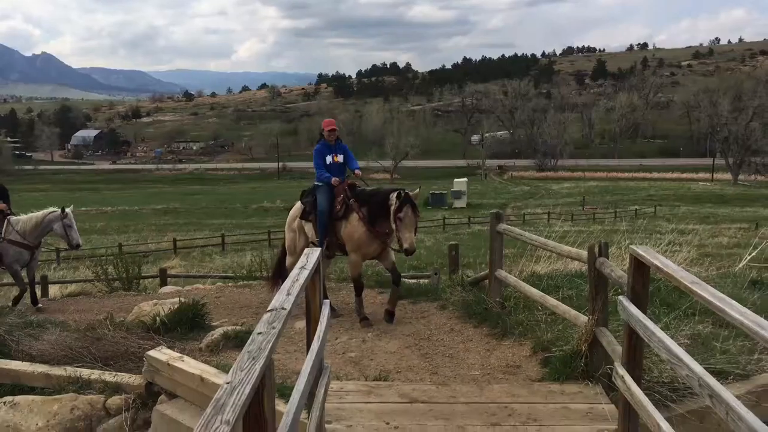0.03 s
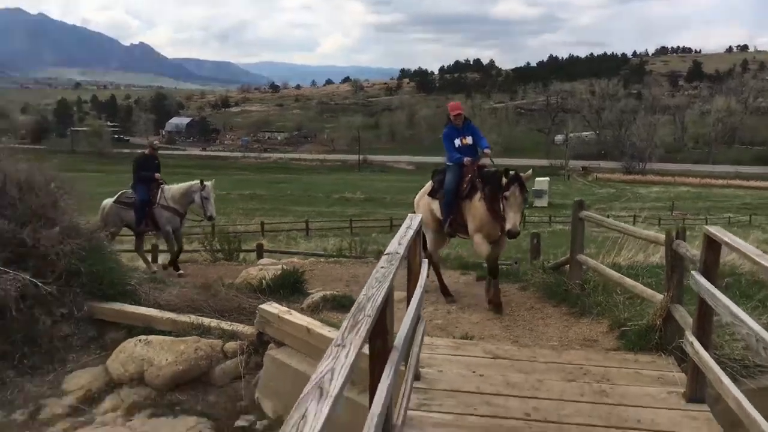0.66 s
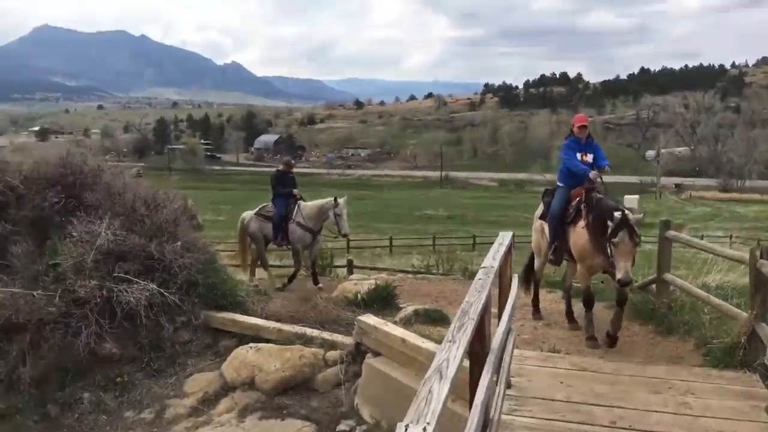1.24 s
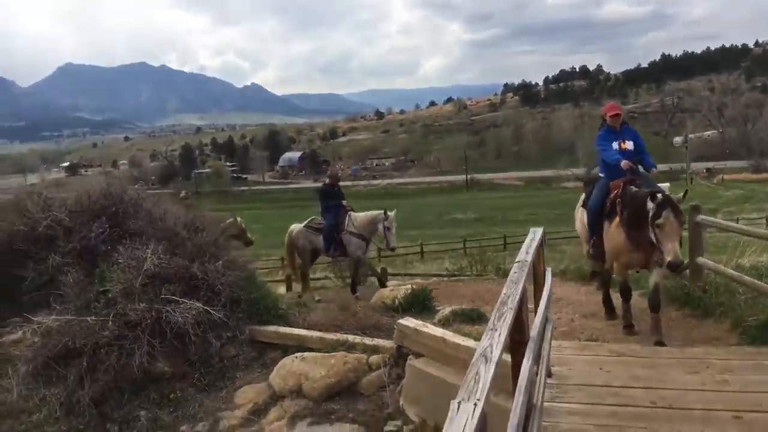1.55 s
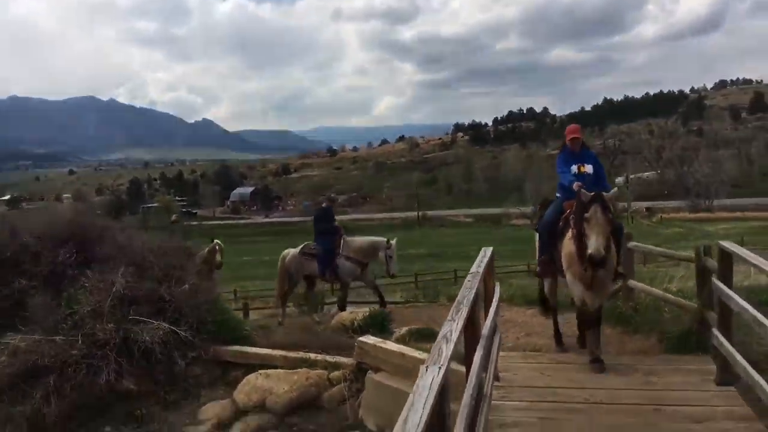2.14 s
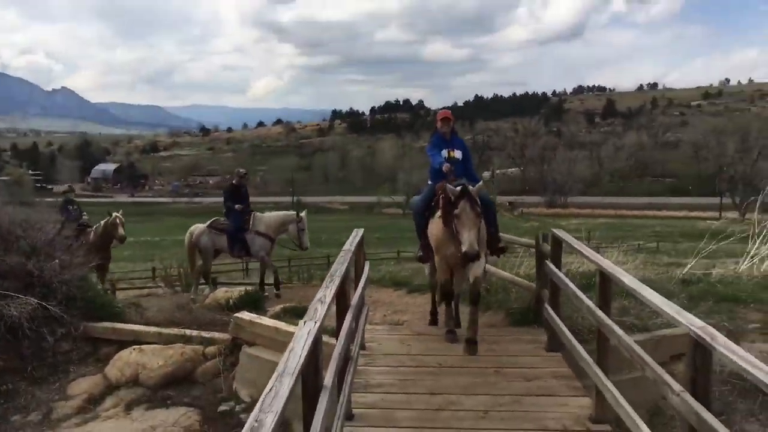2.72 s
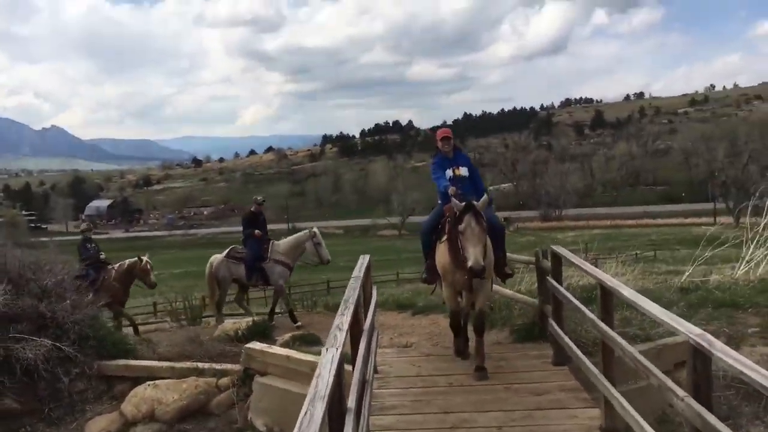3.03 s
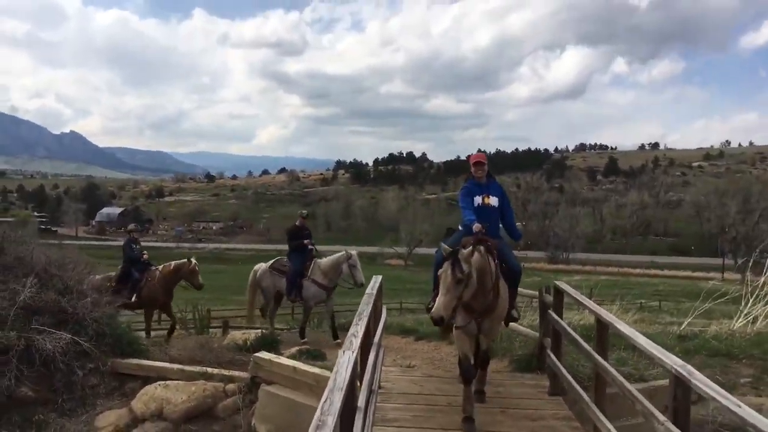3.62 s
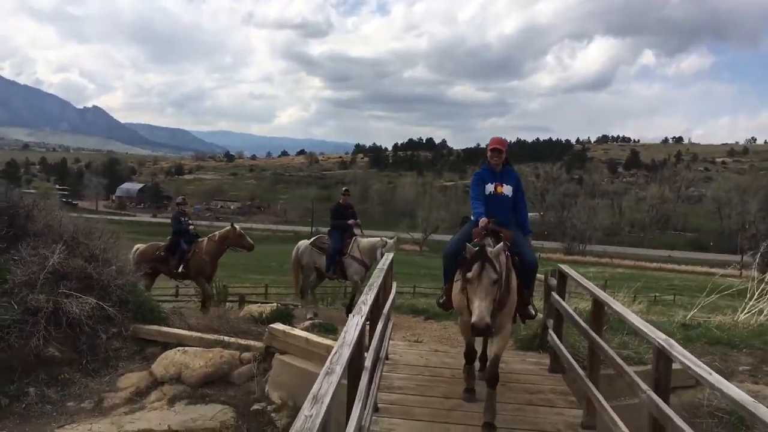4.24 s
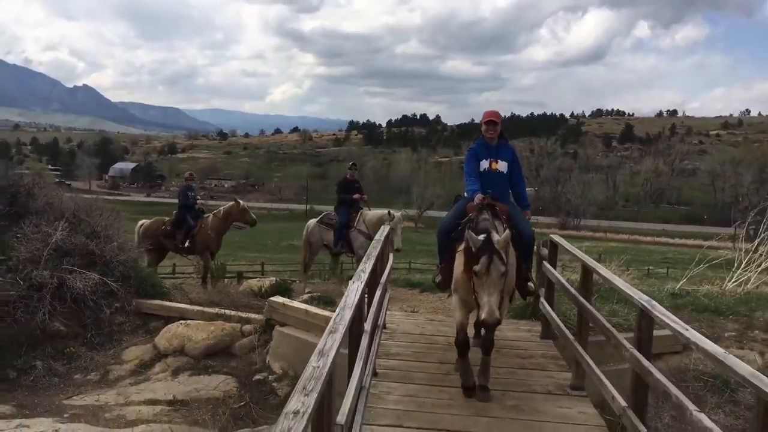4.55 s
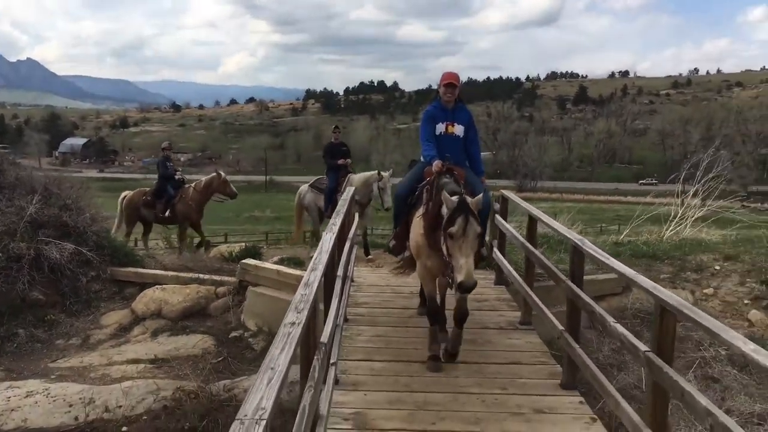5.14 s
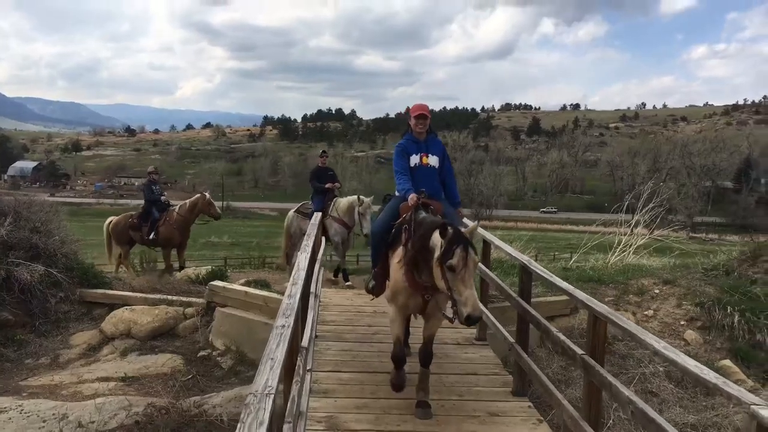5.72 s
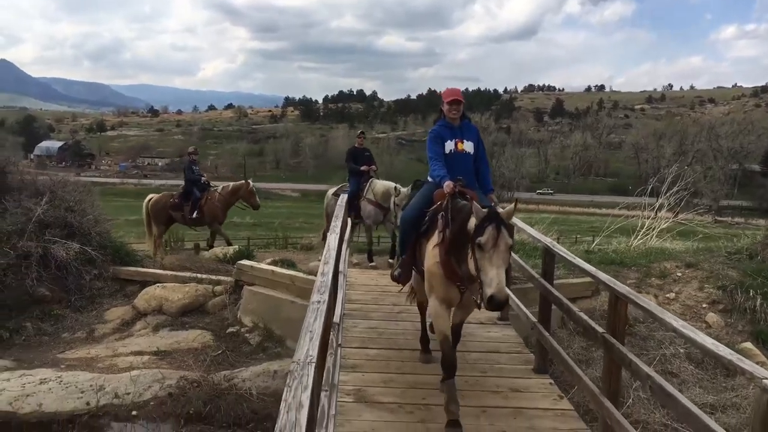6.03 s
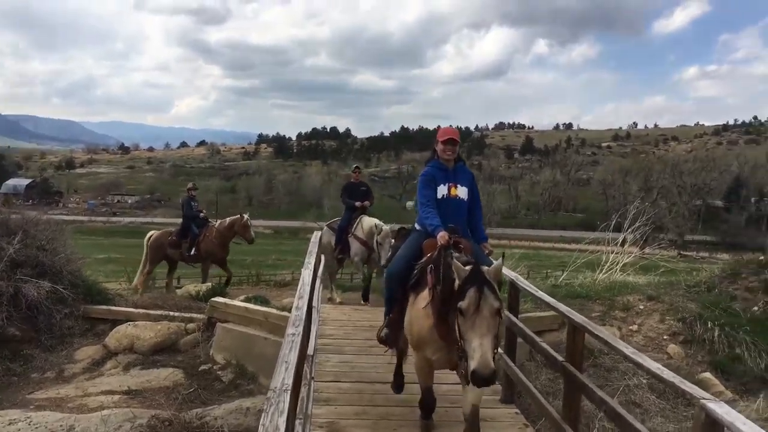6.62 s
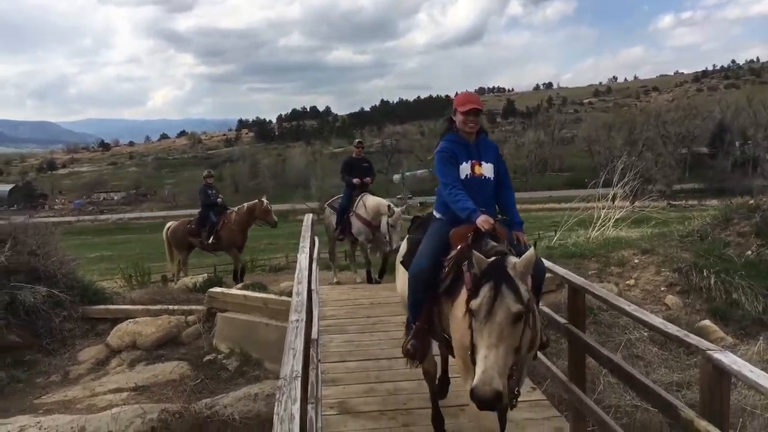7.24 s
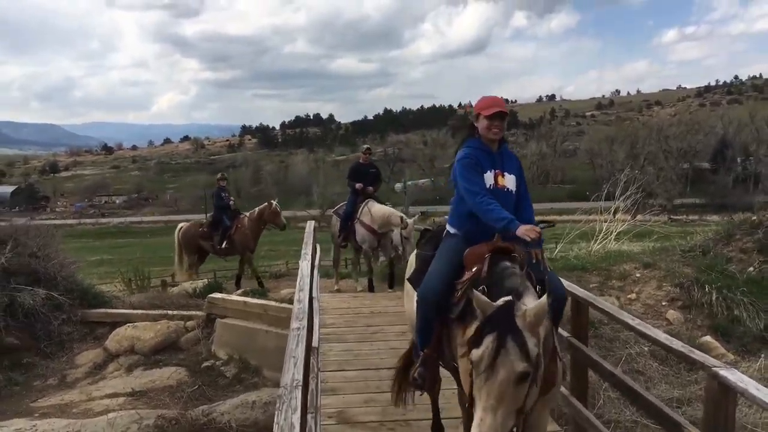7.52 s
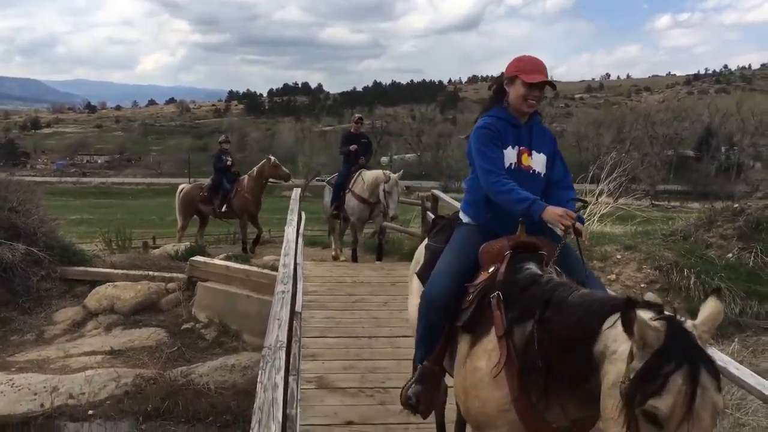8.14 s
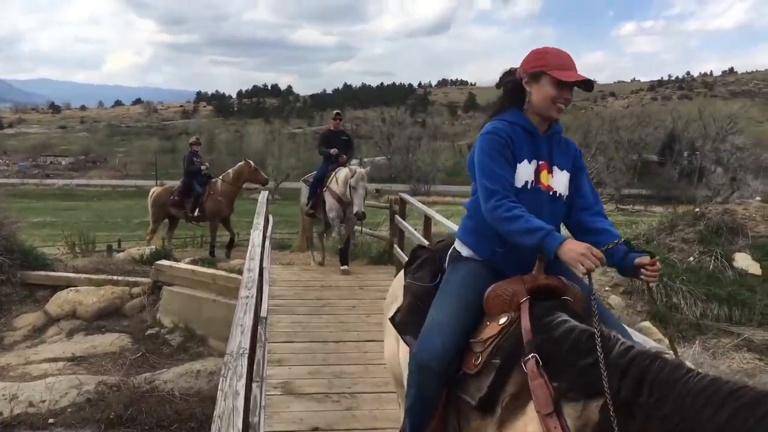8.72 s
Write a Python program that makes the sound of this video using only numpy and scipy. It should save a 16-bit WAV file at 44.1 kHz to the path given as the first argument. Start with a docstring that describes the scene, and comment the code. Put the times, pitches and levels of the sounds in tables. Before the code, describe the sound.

A horse walks over a wooden footbridge in an open valley. Hoofbeats begin almost at once and continue unevenly, about three or four a second, some in quick pairs. Each is a hollow knock on a plank with a low boom from the deck and a slight crunch of grit. A dry click comes just after 1 second as a hoof clips something hard. The heaviest step lands at about 2.2 seconds, and strong, booming steps follow until about 5 seconds. From 6 seconds the steps are somewhat lighter, with another click near 6.8 and a last hard knock at about 8.5. Metal on the bit and saddle clinks faintly throughout, and a buckle rings softly several times between 4 and 7 seconds. Underneath, light wind rumbles on the microphone over a distant rush and a very faint, fast, high ticking.

```python
"""A plank footbridge in an open valley: a horse walks over it, with others following.
Each hoof knocks a plank, crunches grit and sets the whole deck booming; the deck booms again as it
sags under the weight. The metal on bit and saddle clinks, and now and then a hoof clips something hard.
Light wind and a distant rush lie underneath, with a faint, fast ticking close by."""
import sys
import numpy as np
from scipy import signal
from scipy.fft import rfft, irfft, next_fast_len
from scipy.io import wavfile
from scipy.ndimage import uniform_filter1d

SR = 44100
rng = np.random.default_rng(int(sys.argv[2]) if len(sys.argv) > 2 else 0)


def wav_record(signal):
    """Record a signal, one row per channel, as 16-bit PCM in the file named by sys.argv[1]."""
    frames = np.transpose(np.atleast_2d(signal))
    bounded = np.clip(frames, -1, 1)
    # unit amplitude maps onto the largest positive 16-bit level
    quanta = np.round(bounded * 32767).astype(np.int16)
    wavfile.write(sys.argv[1], SR, quanta)


N = 386757
TIME = np.arange(N) / SR
BLOW = np.arange(SR * 6 // 10) / SR  # the seconds that one blow lasts

# Hoof blows; roll_s is how long the hoof takes to roll flat, ring_factor stretches the wood's ringing:
# start_s, roll_s, ring_factor, plank_hz, boom_db, thud_db, knock_db, clack_db
HOOF_BLOWS = [(0.226, .011, 1.34, 401, -31, -34, -43, -50), (0.463, 0.0088, 1.5, 335, -28, -44, -60, -59.5),
              (0.543, 0.0027, 1.02, 313, -27.5, -29.5, -38, -56.5),
              (0.9, 0.0047, 1.2, 297, -40, -32, -33.5, -56),
              (0.966, 0.0042, 0.98, 355, -34.5, -44, -36, -53.5),
              (1.28, 0.0071, 0.54, 384, -29.5, -29.5, -41, -60.5),
              (1.655, 0.0052, .8, 255, -28, -27.5, -36.5, -49.5),
              (1.988, 0.0031, 1.1, 390, -40, -42, -44.5, -68),
              (2.208, 0.0021, 0.65, 327, -12, -22.5, -25.5, -37),
              (2.287, 0.0044, 1.8, 316, -36, -26, -39, -52.5),
              (2.323, 0.0014, 1, 361, -20.5, -35, -34.5, -45.5),
              (2.5, 0.0058, 1.1, 286, -33, -45, -51.5, -65),
              (2.656, 0.0012, .7, 277, -23.5, -27.5, -42, -59),
              (2.911, 0.0057, 1.3, 399, -19, -25, -31.5, -43.5),
              (3.157, 0.0017, .7, 345, -26, -19, -35, -45), (3.198, .004, 1.1, 330, -20.5, -37, -58, -78),
              (3.263, 0.0024, 0.86, 366, -38, -31, -39.5, -66),
              (3.478, 0.0062, 0.53, 353, -32.5, -27.5, -33, -61),
              (3.553, 0.0091, 0.96, 255, -40, -37, -36, -51),
              (3.709, 0.012, 0.69, 379, -22.5, -24, -39.5, -57.5),
              (3.946, 0.0023, 1.45, 308, -33.5, -36, -38.5, -49.5),
              (4.204, 0.0018, 0.63, 420, -22, -34, -35, -56),
              (4.251, 0.0038, 1.2, 411, -37, -35.5, -37, -58),
              (4.596, 0.0054, 1.35, 326, -28.5, -28.5, -38, -56),
              (4.863, 0.0064, 0.8, 285, -18.5, -28.5, -38, -53.5),
              (5.229, 0.0015, 0.96, 362, -28, -28, -30, -53.5),
              (5.51, 0.0056, 0.74, 290, -53, -33.5, -34.5, -63),
              (5.872, 0.002, 1.1, 490, -29, -31.5, -31.5, -49),
              (6.13, .0039, 0.5, 376, -41, -43, -46.5, -88),
              (6.152, .0027, 0.65, 393, -39, -38, -37.5, -81),
              (6.194, 0.0028, 0.74, 372, -47, -41.5, -42.5, -92),
              (6.476, 0.0019, 1.8, 368, -35, -29.5, -38.5, -55.5),
              (6.757, 0.0042, 1.63, 368, -45, -35, -36.5, -54.5),
              (6.89, 0.0085, 1.8, 379, -53, -43.5, -52, -57.5),
              (7.126, 0.0022, 0.65, 330, -30.5, -29.5, -29.5, -48.5),
              (7.164, 0.0028, 1.3, 378, -50, -43, -41, -63),
              (7.384, 0.0064, 1.5, 373.6, -41, -32.5, -37, -55),
              (7.772, 0.0054, 1.24, 287, -38, -33.5, -37, -57.5),
              (8.054, 0.0075, 1.47, 268, -38, -32, -42, -59),
              (8.471, 0.0014, 0.69, 387, -27, -24.5, -21.5, -41)]


def from_db(db):
    """Turn decibels into a number to multiply by."""
    return 10 ** (np.asarray(db) / 20)


def rms_one(x):
    """Scale a sound so that its average strength (rms) is 1."""
    return x / np.sqrt(np.mean(x ** 2) + 1e-20)


def at_level(x, db, opening_s=.04):
    """Scale a sound so that its opening has the given level."""
    return x * from_db(db) / np.sqrt(np.mean(x[:int(opening_s * SR)] ** 2) + 1e-20)


def look_up(x, rows):
    """Read a value off straight lines drawn between (x, value) rows."""
    return np.interp(x, *np.transpose(rows))


def add(track, start_s, sound):
    """Mix a sound into the track at the given time."""
    start = int(np.clip(start_s * SR, 0, N - 1))
    track[start:start + len(sound)] += sound[:N - start]


def fade(fade_s):
    """Die away by 60 dB in fade_s seconds."""
    return np.exp(-np.log(1000) * BLOW / fade_s)


def hiss():
    """Plain noise, as long as one blow."""
    return rng.standard_normal(len(BLOW))


def noise(spectrum, size):
    """Noise of strength 1, shaped by (pitch_hz, relative_db) rows."""
    hz, db = np.transpose(spectrum)
    padded = next_fast_len(size)
    bins_hz = np.arange(padded // 2 + 1) * SR / padded
    gain = from_db(np.interp(np.log(bins_hz + 1), np.log(hz), db))
    shaped = rfft(rng.standard_normal(padded)) * gain
    return rms_one(irfft(shaped, padded)[:size])


def band(x, low_hz, high_hz):
    """Keep the part of a sound between two pitches."""
    return signal.sosfilt(signal.butter(2, [low_hz, high_hz], "band", fs=SR, output="sos"), x)


def resonance(x, hz, width_hz):
    """Make a sound ring at one pitch; a narrower width rings longer."""
    r = np.exp(-np.pi * width_hz / SR)
    feedback = [1, -2 * r * np.cos(2 * np.pi * hz / SR), r * r]
    return signal.lfilter(np.array([1, 0, -1]) * (1 - r * r) / 2, feedback, x + 1e-18)


def valley(rush_db=-53, swell_db=2.28, wind_boost_db=1):
    """Distant air rushes and swells a little, while wind rumbles on the microphone."""
    # Tone of the valley air: pitch_hz, relative_db
    rush_tone = [(100, -14.5), (200, 6.5), (320, -4), (480, -6.5), (870, -1), (1100, -7.5), (1500, -11.5),
                 (2100, -11.5), (2550, -23.5), (4500, -24.5), (5300, -25.5), (6700, -23.5), (10000, -44),
                 (16000, -63)]
    # Tone of the wind: pitch_hz, relative_db
    wind_tone = [(15, -10), (28, -31), (42, 1), (58, 4), (75, -1.5), (100, -8.5), (160, -20), (300, -40.5),
                 (800, -56)]
    # Gusts, before the boost: time_s, level_db
    gusts = [(0.3, -36.5), (0.44, -34), (0.7, -37), (2.16, -41), (2.42, -38), (2.73, -36), (3.11, -34.5),
             (3.91, -42.5), (5.02, -35), (7.0, -44.5), (7.45, -38), (8.09, -41.5), (8.22, -45.5),
             (8.77, -41.5)]
    wind = from_db(look_up(TIME, gusts) + wind_boost_db) * noise(wind_tone, N)
    swell = rms_one(uniform_filter1d(rng.standard_normal(N), size=SR // 4))
    return from_db(rush_db + swell_db * swell) * noise(rush_tone, N) + wind


def ticking(level_db=-66, ticks_per_s=60, strays_per_s=35, jitter_s=0.00014, uneven_db=2):
    """Tiny, nearly regular ticks with stray ones between them, all with the same high ring."""
    # The ring of a tick: pitch_hz, width_hz, relative_db
    tick_notes = [(4490, 650, 3.5), (6530, 510, 10), (8120, 410, -3.5), (9030, 250, -6.5)]
    clicks = 1.0 * (rng.random(N) < strays_per_s / SR)
    beats_s = np.arange(0, N / SR, 1 / ticks_per_s)
    beats_s += jitter_s * rng.standard_normal(len(beats_s))
    clicks[np.clip(beats_s * SR, 0, N - 1).astype(int)] = 1
    clicks *= from_db(uneven_db * rng.standard_normal(N))
    rings = sum(from_db(db) * resonance(clicks, hz, width) for hz, width, db in tick_notes)
    return from_db(level_db) * rms_one(band(rings, 2100, 10500))


def clink(scrape_s, hz, ring_db, fade_s):
    """A short scrape rings a small piece of metal, with a glint high above."""
    rub = hiss() * np.exp(-BLOW / scrape_s)
    metal = resonance(rub, hz, width_hz=np.log(1000) / (np.pi * fade_s))
    glint = resonance(rub, 11800 * (1 + 0.062 * rng.standard_normal()), width_hz=900)
    scrape = band(rub, 2900, 6200) + from_db(-12) * band(rub, 6000, 10200) + from_db(-8) * glint
    return at_level(scrape, 0) + at_level(metal, ring_db)


def bit_and_saddle(clink_hz=4430, buckle_hz=6120, faint_db=-65, faint_count=45):
    """Metal clinks as the saddle moves: clear clinks, one ringing buckle and faint clinks at random."""
    # Clinks and scuffs: start_s, scrape_s, ring_over_scrape_db, level_db
    clinks = [(0.218, 0.044, -7, -53.5), (0.25, 0.01, -9, -53), (1.004, .0094, -3, -51),
              (1.218, 0.03, -7, -56), (1.243, 0.01, -4, -56), (2.21, .002, -12, -61),
              (3.584, 0.011, 1, -57.5), (3.685, 0.031, -4, -58.5), (4.137, .001, -6, -70),
              (4.254, 0.0031, -17, -61.5), (4.645, 0.0069, -9, -60.5), (4.895, 0.0055, -6, -53.5),
              (5.183, 0.018, 2, -56.5), (5.734, 0.028, -10, -58), (6.122, .0015, -8, -66),
              (6.562, 0.0023, -17, -55.5), (6.785, .004, -1, -51.5), (6.9, 0.029, -7, -55),
              (7.621, 0.0093, -12, -57.5), (7.785, .0072, -7, -57), (7.847, 0.011, -16, -56),
              (8.088, 0.0077, -18, -50.5), (8.509, .013, -23, -58.5), (8.584, 0.0099, 11, -57.5)]
    # Rings of the buckle: start_s, level_db
    buckle_rings = [(3.984, -59), (5.313, -56), (6.349, -60), (6.562, -59), (7.16, -55)]
    out = np.zeros(N)
    for start_s, scrape_s, ring_db, db in clinks:
        hz = clink_hz * (1 + 0.032 * rng.standard_normal())
        add(out, start_s, at_level(clink(scrape_s, hz, ring_db, fade_s=.015), db))
    for start_s, db in buckle_rings:
        buckle = clink(scrape_s=0.0062, hz=buckle_hz, ring_db=-3.5, fade_s=0.17)
        add(out, start_s, at_level(buckle, db))
    for when, pitch, softness in rng.random((faint_count, 3)):
        faint = clink(scrape_s=0.0089, hz=3400 + 1800 * pitch, ring_db=-4, fade_s=0.01)
        add(out, when * N / SR, at_level(faint, faint_db - 6 * softness))
    return out


def hoof_force(roll_s, touches_per_s=2500):
    """The toe strikes first, then the rim of the hoof rolls down in many small touches."""
    touches = (rng.random(len(BLOW)) < touches_per_s / SR) * hiss()
    force = touches * BLOW / roll_s * np.exp(1 - BLOW / roll_s)
    force[0] = 2.18  # the toe
    return force


def wood(force, notes, ring_factor, low_hz, high_hz, crack_db, rattle_db, rattle_s):
    """A struck plank gives a dry crack and rings at its own notes; its neighbours rattle on."""
    hz, db, fade_s = np.transpose(notes)[:, :, None]
    tuning, strength, side = rng.standard_normal((3, len(notes), 1))  # no two blows ring alike
    gain = from_db(db + 2 * strength) * np.sign(side)
    waves = np.sin(2 * np.pi * hz * (1 + 0.033 * tuning) * BLOW)
    rings = (gain * fade(fade_s * ring_factor) * waves).sum(axis=0)
    struck = signal.fftconvolve(force, at_level(rings, 0))[:len(BLOW)]
    crack = signal.fftconvolve(force, hiss() * fade(0.023 * ring_factor))[:len(BLOW)]
    crack = at_level(band(crack, low_hz, high_hz), crack_db)
    rattle = rms_one(band(hiss(), low_hz, high_hz)) * fade(rattle_s * ring_factor)
    body = at_level(struck, 0) + crack + from_db(rattle_db) * rattle
    return band(body, 0.71 * low_hz, 1.234 * high_hz)


def wood_note(hz, fade_s, roll_s):
    """One clear note of the wood swells as the weight comes on; low notes take longer."""
    swell = 1 - np.exp(-BLOW / (roll_s + 0.68 / hz))
    return np.sin(2 * np.pi * hz * BLOW) * swell * fade(fade_s)


def grit(decay_s, uneven_db=4):
    """Grains crushed under the hoof make a short, rough hiss."""
    # Tone of crushed sand: pitch_hz, relative_db
    grit_tone = [(1500, 1), (2400, -10.5), (3300, -2), (4500, -3), (5500, -10), (7000, -30), (10000, -20),
                 (16000, -47)]
    grains = from_db(uneven_db * rms_one(uniform_filter1d(hiss(), size=40)))
    return noise(grit_tone, len(BLOW)) * grains * np.exp(-BLOW / decay_s)


def hooves(usual_plank_hz=345, usual_clack_db=-57):
    """Each hoof rings a plank, shakes the boards around it and crushes some grit."""
    # Notes of a plank on its beams: pitch_hz, relative_db, base_fade_s
    plank_notes = [(110.8, 2.5, 0.18), (144.6, -10, 0.068), (165.1, -3, 0.29), (209.7, -5.5, 0.34),
                   (231.8, -5.5, 0.21), (266.7, 0, 0.14), (317, -3.5, 0.12), (393, -3.5, 0.15),
                   (432.8, -7, 0.13), (524, 0.5, 0.23), (578, 6.5, 0.17), (631.6, -1, 0.33),
                   (673, -1, 0.11), (860, -3, 0.21), (997, -11, 0.17), (1152, -4, 0.031),
                   (1305, 10.5, 0.059), (1450, -28, 0.025), (1727, 6, 0.26), (1827, 6.5, 0.072),
                   (2043, 8.5, 0.14)]
    # The four parts of a blow, low to high (thud, knock, clop, clack):
    # low_hz, high_hz, crack_db, rattle_db, base_rattle_fade_s, main_note_db, base_main_note_fade_s
    parts = [(92.6, 210, -3.5, -0.5, 0.51, 0.5, 0.076), (236, 516, -4.5, -3, 0.37, -2, 0.095),
             (540, 1080, -2.5, -5, 0.22, -6, 0.089), (865, 1846, 7.5, 9, 0.28, -14, 0.012)]
    # Borders that share the plank's notes among the parts: pitch_hz
    borders_hz = [260, 500, 950]
    # Each part's main note: base_pitch_hz, share_of_plank_tuning, spread_octaves
    main_notes = [(118.9, 0.066, .17), (345, 0.96, 0.033), (587.4, 0.55, .1), (1040, 0.1, .16)]
    # Only the hardest blows reach the plank's high note: clack_db, clack_pitch_factor
    clack_rise = [(-39.5, 0.94), (-37.5, 2.19)]
    # Grit under a usual blow, thick before the bridge and thin on it: time_s, level_db
    grit_levels = [(0.9, -56), (2.5, -59.5), (5.5, -60), (8.4, -58)]
    out, plank = np.zeros(N), np.array(plank_notes)
    part_of_note = np.digitize(plank[:, 0], borders_hz)
    for start_s, roll_s, ring_factor, plank_hz, _, thud_db, knock_db, clack_db in HOOF_BLOWS:
        # where the hoof lands decides which notes stand out
        main_hz = [hz * (plank_hz / usual_plank_hz) ** share * 2 ** (spread * rng.standard_normal())
                   for hz, share, spread in main_notes]
        main_hz[-1] *= look_up(clack_db, clack_rise)
        clop_db = knock_db + 0.49 * (clack_db - knock_db) + 2.5
        levels_db = [thud_db, knock_db, clop_db, clack_db]
        force = hoof_force(roll_s)
        for k, (*wood_settings, note_db, note_fade_s) in enumerate(parts):
            body = wood(force, plank[part_of_note == k], ring_factor, *wood_settings)
            main = wood_note(main_hz[k], note_fade_s * ring_factor, roll_s)
            add(out, start_s, at_level(at_level(body, 0) + at_level(main, note_db), levels_db[k]))
        # loose boards along the bridge drum on after the thud
        boards = rms_one(band(hiss(), 107, 293)) * fade(0.51)
        add(out, start_s, from_db(thud_db - 23) * boards)
        grit_db = look_up(start_s, grit_levels) + 0.57 * (clack_db - usual_clack_db)
        add(out, start_s, at_level(grit(decay_s=6.3 * roll_s + .002), grit_db))
    return out


def boom(hz, swell_s=0.012):
    """The heavy deck starts to swing; the rest of the bridge rumbles on after it."""
    swing = np.sin(2 * np.pi * hz * BLOW) * (1 - np.exp(-BLOW / swell_s)) * fade(0.26)
    rumble = rms_one(band(hiss(), 52.6, 69.5)) * (1 - np.exp(-BLOW / 0.014)) * fade(0.79)
    return at_level(swing, 0) + from_db(-13) * rumble


def deck(lag_s=0.0049, sag_after_s=.095, sag_hz=61.2, usual_sag_db=-36.5, usual_knock_db=-34.5):
    """The deck booms under each blow and again as it sags under the horse's weight."""
    # A heavy landing booms lower than a light one: boom_db, pitch_hz
    boom_pitch = [(-32, 81.9), (-19, 69)]
    out = np.zeros(N)
    for start_s, _, _, _, boom_db, _, knock_db, _ in HOOF_BLOWS:
        add(out, start_s + lag_s, at_level(boom(look_up(boom_db, boom_pitch)), boom_db))
        sag = boom(sag_hz * (1 + 0.047 * rng.standard_normal()))
        sag_db = usual_sag_db + 0.48 * (knock_db - usual_knock_db)
        add(out, start_s + sag_after_s, at_level(sag, sag_db))
    return out


def glancing_hooves():
    """A hoof's rim grazes something hard: a dry click, a bright snap and a little grit."""
    # Glancing touches: start_s, level_db
    touches = [(1.14, -37.5), (3.844, -50.5), (4.559, -53.5), (4.896, -53), (6.784, -46)]
    out = np.zeros(N)
    for start_s, db in touches:
        click = band(hiss() * fade(.016), 400, 1350)
        snap = band(hiss() * fade(0.0093), 3700, 21000)
        crunch = grit(decay_s=.003)
        add(out, start_s, at_level(click, db) + at_level(snap, db - 25) + at_level(crunch, db - 12))
    return out


def scene():
    """Horses and bridge in the open air, in one channel."""
    return (hooves() + glancing_hooves() + deck() + bit_and_saddle() + ticking() + valley())[None]


def record(dry, start_s=0.0818, cutoff_hz=15900):
    """The sound opens after a moment of silence; the highest treble is cut."""
    opened = dry * np.clip((TIME - start_s) / 0.0032, 0, 1)
    return signal.sosfilt(signal.ellip(10, .1, 90, cutoff_hz, fs=SR, output="sos"), opened)


dry = scene()
out = record(dry)
wav_record(out)
```